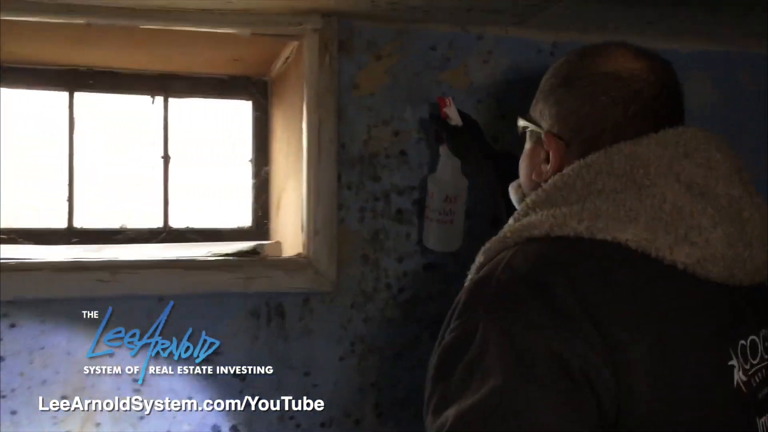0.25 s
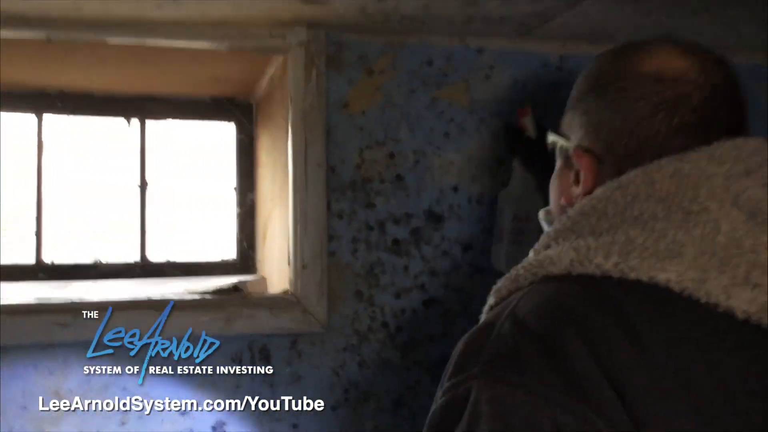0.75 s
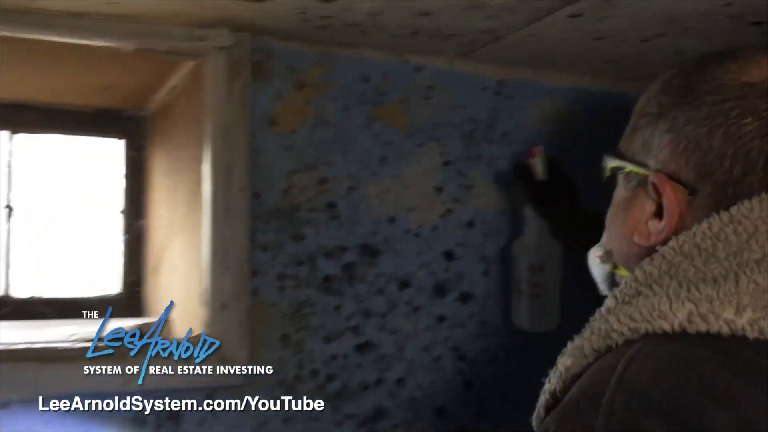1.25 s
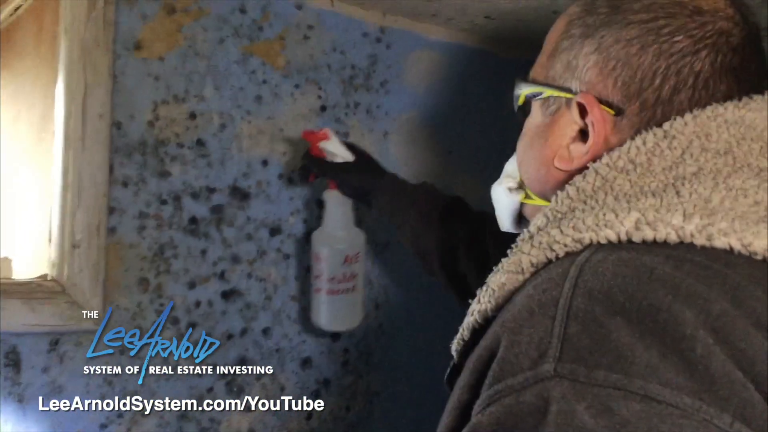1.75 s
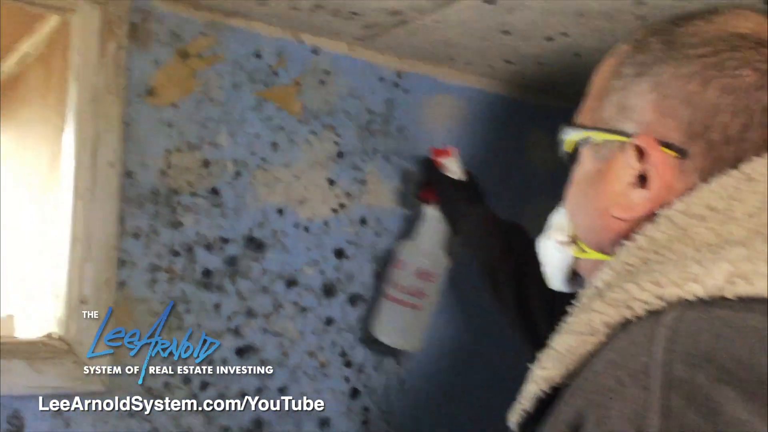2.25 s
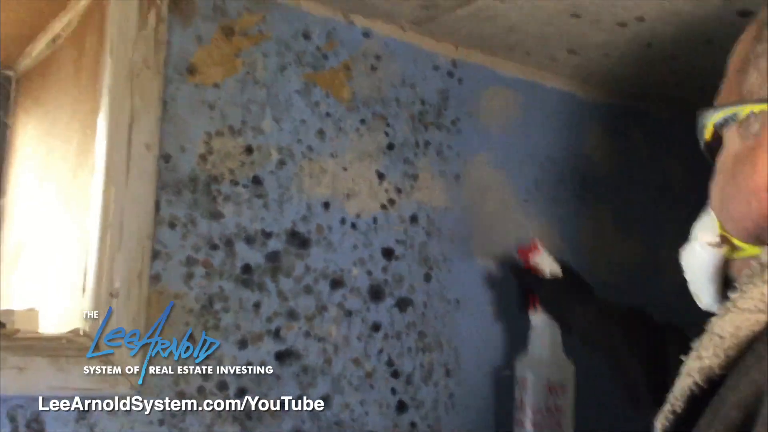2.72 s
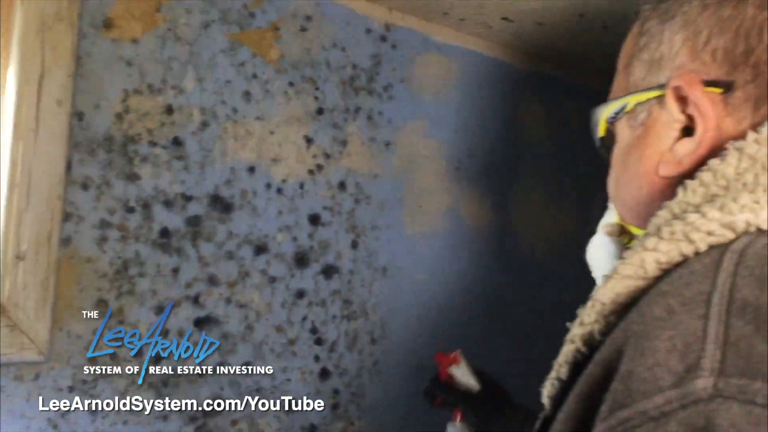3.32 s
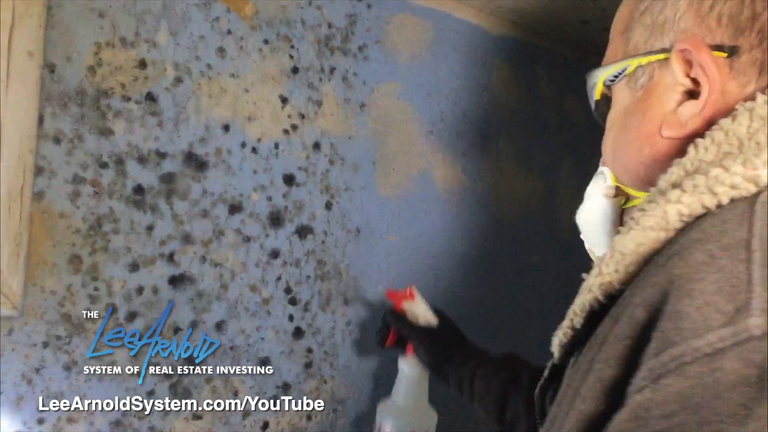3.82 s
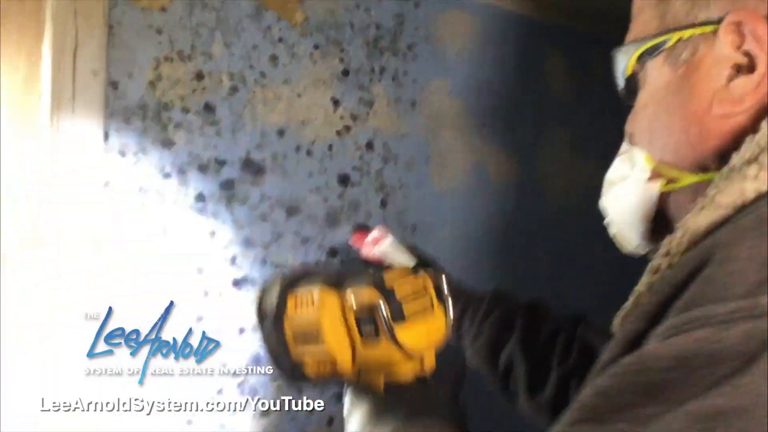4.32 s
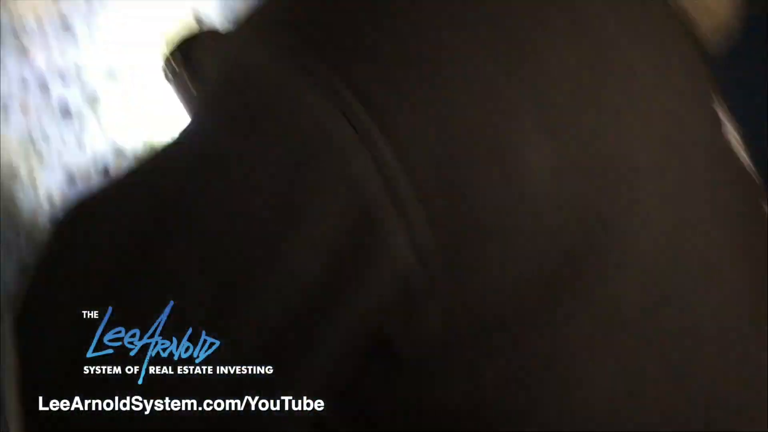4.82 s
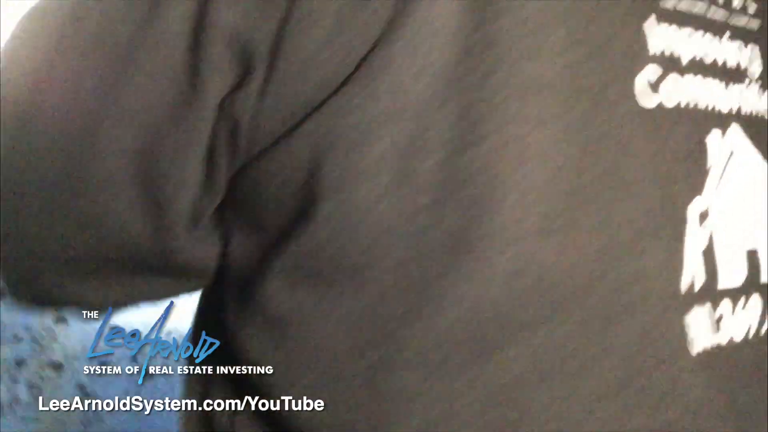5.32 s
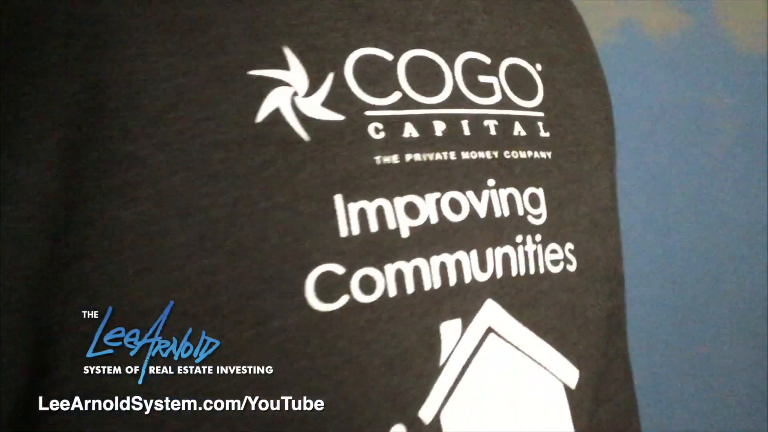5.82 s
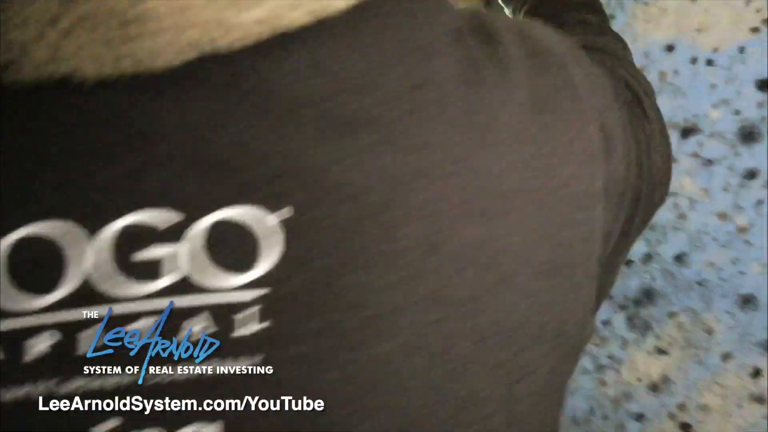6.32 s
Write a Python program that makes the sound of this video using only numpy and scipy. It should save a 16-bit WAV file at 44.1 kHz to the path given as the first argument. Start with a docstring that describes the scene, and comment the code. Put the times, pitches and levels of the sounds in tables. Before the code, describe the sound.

A trigger spray bottle is pumped sixteen times at a wall, in an even rhythm of two or three squirts a second. Each pull gives a short, bright hiss, with faint plastic ticks before and after. A heavy jacket rustles softly, and the close hand-held microphone takes a few dull bumps near the start and near the end. The room is small and quiet, with a faint low rumble.

```python
"""In a small, quiet room, a trigger spray bottle is pumped sixteen times at a wall.
Each pull starts with a faint plastic tick, then a coarse jet breaks into fine mist as the pressure
peaks, and the trigger ticks back. A heavy jacket rustles as cloth slides on cloth, and the hand-held
microphone takes a few dull bumps and snaps. Underneath lie a low rumble and, early on, a faint hum."""
import sys
import numpy as np
from scipy import signal
from scipy.fft import rfft, irfft
from scipy.io import wavfile
from scipy.ndimage import uniform_filter1d

SR = 44100
rng = np.random.default_rng(int(sys.argv[2]) if len(sys.argv) > 2 else 0)


def materialize(psi):
    """Save the field psi as 16-bit PCM at rate SR to the path in sys.argv[1].

    A 1-D psi becomes a single channel; in a 2-D psi each row is a channel.
    """
    bounded = np.clip(np.atleast_2d(psi).T, -1, 1)
    quanta = np.round(bounded * 32767).astype(np.int16)
    wavfile.write(sys.argv[1], SR, quanta)


N = 289296

# Decay of the room: (frequency [Hz], time to fall 60 dB [s])
ROOM_DECAY = [(200, 0.33), (1500, 0.2), (5000, 0.18), (10000, 0.19), (16000, 0.16)]
# Colour of the room tone: (frequency [Hz], relative level [dB])
RUMBLE_SPECTRUM = [(20, -21.5), (50, -9.5), (100, 4), (170, 0.5), (260, -3.5), (420, -12), (600, -14.5),
                   (900, -28.5), (1600, -36.5), (2600, -50.5), (5000, -43.5), (16000, -54.5)]
# The rumble swells twice and dips once: (centre time [s], half-width [s], gain [dB])
RUMBLE_RIDES = [(1.149, .35, 4.5), (4.85, 0.11, 8), (5.76, 0.095, -19)]
# Movements of the jacket: (centre time [s], length [s], swish level [dB], rub level [dB])
JACKET_MOVES = [(0.022, 0.28, -62, -71), (.42, 0.32, -66, -79), (0.896, 0.47, -57.5, -74.5),
                (1.08, 0.28, -73, -67.5), (1.87, 0.49, -93, -75), (2.47, 0.33, -89, -76),
                (2.888, 0.12, -97, -80), (4.076, .14, -85, -75), (4.796, 0.6, -63.5, -65.5),
                (5.33, 0.61, -80, -74), (5.67, 0.11, -67, -69), (5.75, 1.5, -81.5, -90.5),
                (6.01, 0.27, -74, -64), (6.42, 0.7, -78, -77.5)]
# The cloth's bright swish and soft rub: (frequency [Hz], relative level [dB])
SWISH_SPECTRUM = [(500, -6.5), (2000, -3.5), (4500, -6), (7000, -2.5), (8500, 1), (10500, -1), (13000, -1),
                  (16000, 1)]
RUB_SPECTRUM = [(100, 2.5), (300, 9.5), (800, 5.5), (1300, 7), (2300, -4.5), (3500, -22), (6000, -16.5),
                (16000, -30.5)]
# Quick sleeve slides: (time [s], length [s], level [dB], start pitch [Hz], end pitch [Hz],
# half-bandwidth [Hz])
SLEEVE_SLIDES = [(.034, 0.099, -56.5, 13300, 13300, 1300), (0.444, 0.027, -59, 13600, 13800, 1500),
                 (0.737, .31, -63, 8360, 8890, 800), (0.844, .17, -60, 1950, 3120, 582)]
# Dull bumps on the microphone: (peak time [s], level [dB], pitch [Hz], swell [s], decay [s])
MIC_BUMPS = [(.037, -56.5, 598, 0.016, 0.044), (.09, -48.5, 620, 0.016, .018),
             (.4268, -30.5, 735, 0.0032, 0.0019), (.46, -57.5, 678, 0.032, .008),
             (.495, -54.5, 130, .0042, 0.027), (1.678, -62.5, 533, .002, .01),
             (1.706, -62.5, 547, .003, 0.028), (3.219, -59.5, 118, 0.0057, 0.015),
             (5.556, -28.5, 582, .0016, 0.0038), (5.559, -38.5, 197.9, 0.0018, .005),
             (5.939, -49, 638, 0.0038, 0.0044), (5.988, -48.5, 333, .005, 0.017),
             (5.998, -37.5, 188, .004, 0.0028), (6.06, -55.5, 266, .04, 0.042),
             (6.459, -55, 447, .0012, .0028)]
# Short side modes of every bump: (pitch [multiple of the bump's], relative level [dB], decay [s])
BUMP_SIDE_MODES = [(.8, -14, .003), (1.36, -12, 0.0025)]
# Small handling snaps: (time [s], level [dB], low-pass cutoff [Hz])
HANDLING_SNAPS = [(.4185, -51, 17000), (0.4235, -41, 17000), (.503, -59, 5000), (0.523, -54.5, 5000),
                  (.54, -58, 5000), (0.553, -58, 5000)]
# Colours of a handling snap and of the trigger's tick: (frequency [Hz], relative level [dB])
SNAP_SPECTRUM = [(300, -24), (1000, -22.5), (1700, 3.5), (2600, 8), (4200, 5), (6000, -2), (8500, 4),
                 (16000, -1.5)]
TICK_SPECTRUM = [(500, -13), (2500, -12), (4500, -16.5), (6000, -3), (8300, -1), (10500, -1), (14300, 5.5),
                 (16000, -2)]
# Colours of the coarse jet and of the fine mist: (frequency [Hz], relative level [dB])
JET_SPECTRUM = [(100, -35.5), (400, -16), (700, -11), (1000, -9), (1500, -3.5), (2200, -2), (3300, -2.5),
                (4500, -2), (6000, -6), (10000, -12.5), (16000, -13)]
MIST_SPECTRUM = [(500, -46.5), (1800, -19), (3000, -3.5), (3900, 1.5), (4650, 6), (5400, 3.5), (6200, 0),
                 (7400, -0.5), (8400, 1.5), (9600, -2), (11000, -2.5), (13000, -2), (15000, -4),
                 (16000, -7.5)]
# Pulls of the trigger: (time [s], length [s], base level [dB], jet trim [dB],
# treble lift as the nozzle turns [dB], base tick level [dB])
TRIGGER_PULLS = [(0.195, 0.15, -41, 2.4, 4, -77.5), (0.573, 0.17, -40.5, -1.4, 2.5, -71),
                 (.987, .15, -41.5, 3.5, 1.5, -71), (1.365, 0.16, -40.1, 2, 3.1, -69.5),
                 (1.78, 0.19, -39.5, 2, 3, -74.5), (2.248, 0.16, -39.5, 2, 2, -74.5),
                 (2.642, .14, -39, 2.4, 3, -68.5), (3.006, 0.17, -40, 2.5, 3.5, -70),
                 (3.407, .165, -39.5, 2, 3, -71.5), (3.83, 0.19, -40, 3, 3.5, -76),
                 (4.237, 0.18, -39, 4, 4, -66), (4.645, .18, -39.5, 3.5, 4.5, -63),
                 (5.054, 0.19, -40.5, 2.5, 4, -70), (5.459, .183, -41, 2.9, 4.5, -82),
                 (5.866, 0.18, -42, 4.5, 4, -72), (6.269, 0.16, -39.5, 2, 3.5, -73)]

RUMBLE_DB = -75
HUM_HZ, HUM_DB, HUM_FROM_S, HUM_TO_S, HUM_FADE_S = 156.6, -74, 0.7, 2.65, 0.071
STILL_SWISH_DB, STILL_RUB_DB = -92.5, -96.5  # the cloth never quite rests
TICK_LEAD_S, RETURN_LAG_S, RETURN_SPREAD_S, RETURN_DB, RETURN_SPREAD_DB = 0.054, 0.07, 0.014, -76, 5
JET_LEAD_S, JET_ATTACK_S, JET_STOPS_EARLY_S, JET_RELEASE_S = 0.0073, 0.0056, 0.0088, 0.017
MIST_LAG_S, MIST_ATTACK_S, MIST_STOPS_EARLY_S, MIST_RELEASE_S = 0.011, 0.009, 0.02, 0.0135
JET_TRIM_DB, MIST_TRIM_DB = -10.5, 0.56
MIST_SWELL_DB, JET_SAG_DB = 7.5, 2  # at peak pressure more of the jet turns into mist
WALL_ECHO_MS, WALL_ECHO_GAIN = (0.3, 1.25), -0.078  # the delay changes with the aim
LOW_CUT_HZ, HIGH_CUT_HZ = 62, 15950


def gain_of(db):
    """Decibels to amplitude."""
    return 10 ** (np.asarray(db) / 20)


def unit_rms(x):
    """Scales to rms 1."""
    return x / np.sqrt(np.mean(x ** 2) + 1e-20)


def curve_at(points, hz):
    """Reads a table on a log-frequency axis."""
    freqs, values = np.transpose(points)
    return np.interp(np.log(hz + 1), np.log(freqs + 1), values)


def add(mix, time, sound):
    """Mixes a sound in at a time in seconds."""
    start = round(time * SR)
    sound = sound[max(-start, 0):]
    part = mix[max(start, 0):][:len(sound)]
    part += sound[:len(part)]


def noise(spectrum, size):
    """Noise of rms 1 with the given colour."""
    colour = gain_of(curve_at(spectrum, np.fft.rfftfreq(size, 1 / SR)))
    return unit_rms(irfft(rfft(rng.standard_normal(size)) * colour, size))


def wander(hz, size):
    """Smooth random modulation of rms 1, rolled off above hz."""
    rolloff = 1 + (np.fft.rfftfreq(size, 1 / SR) / hz) ** 4
    return unit_rms(irfft(rfft(rng.standard_normal(size)) / rolloff, size))


def gate(t, start, stop, attack, release):
    """Attack, hold and release with rounded corners."""
    return (1 + np.tanh((t - start) / attack / 2)) * (1 + np.tanh((stop - t) / release / 2)) / 4


def room(x, wet_db, size=16384):
    """Direct sound plus a fresh diffuse tail, as heard from one position in the room."""
    hz, t, bands = signal.stft(rng.standard_normal(size), SR, nperseg=256)
    decay = gain_of(-60 * t / curve_at(ROOM_DECAY, hz)[:, None])
    tail = signal.istft(bands * decay, SR, nperseg=256)[1]
    tail *= np.minimum(np.arange(len(tail)) / SR / 0.0007, 1)
    response = gain_of(wet_db) * tail / np.linalg.norm(tail)
    response[0] += 1
    return signal.fftconvolve(x, response / np.linalg.norm(response))


def room_tone():
    """A bed of uneven low rumble, with a wavering hum that fades in and out."""
    t = np.arange(N) / SR
    ride_db = sum(db * np.exp(-((t - centre) / width) ** 2) for centre, width, db in RUMBLE_RIDES)
    rumble = noise(RUMBLE_SPECTRUM, N) * gain_of(RUMBLE_DB + ride_db + 3.75 * wander(9, N))
    hum_level = gain_of(HUM_DB + 6.3 * wander(11, N))
    hum_level *= gate(t, HUM_FROM_S, HUM_TO_S, HUM_FADE_S, HUM_FADE_S)
    hum_hz = HUM_HZ + 4 * wander(12, N)
    return rumble + hum_level * np.sin(2 * np.pi * np.cumsum(hum_hz) / SR)


def jacket():
    """Cloth sliding on cloth: a grainy swish over a softer rub, swelling with each movement."""
    t = np.arange(N) / SR
    swish, rub = gain_of(STILL_SWISH_DB), gain_of(STILL_RUB_DB)
    for centre, length, swish_db, rub_db in JACKET_MOVES:
        swell = np.maximum(1 - (2 * (t - centre) / length) ** 2, 0) ** 1.28
        swish = swish + gain_of(swish_db) * swell
        rub = rub + gain_of(rub_db) * swell
    catching = gain_of(1.5 * wander(50, N))
    folds = gain_of(2.2 * wander(16, N))  # folds make the rub lumpy
    return catching * (swish * noise(SWISH_SPECTRUM, N) + folds * rub * noise(RUB_SPECTRUM, N))


def sleeve():
    """The weave hisses in a narrow band, which sweeps upward when the arm speeds up."""
    out = np.zeros(N)
    for time, length, db, start_hz, end_hz, width_hz in SLEEVE_SLIDES:
        size = int(length * SR)
        phase = 2 * np.pi * np.cumsum(np.linspace(start_hz, end_hz, size)) / SR
        band = wander(width_hz, size) * np.cos(phase) + wander(width_hz, size) * np.sin(phase)
        add(out, time, gain_of(db) * band * np.sin(np.linspace(0, np.pi, size)))
    return out


def click(db, spectrum, decay, size=4096):
    """A noise burst with an instant attack and an exponential tail."""
    return gain_of(db) * noise(spectrum, size) * np.exp(-np.arange(size) / SR / decay)


def bump(time, db, hz, swell, decay, size=12000):
    """A damped, unsteady ring swells as the hand presses and dies as it lets go: (start, sound)."""
    t = (np.arange(size) - size // 2) / SR
    cycles = np.cumsum(hz * (1 + 0.084 * wander(100, size))) / SR
    cycles -= cycles[size // 2]
    ring = np.exp(np.minimum(t / swell, -t / decay)) * np.sin(2 * np.pi * cycles)
    for ratio, mode_db, mode_decay in BUMP_SIDE_MODES:
        ring += gain_of(mode_db) * np.exp(-abs(t) / mode_decay) * np.sin(2 * np.pi * ratio * cycles)
    return time + t[0], gain_of(db) * ring


def handling():
    """Bumps and snaps right at the microphone, almost dry."""
    out = np.zeros(N)
    for row in MIC_BUMPS:
        add(out, *bump(*row))
    for time, db, cutoff_hz in HANDLING_SNAPS:
        lowpass = signal.butter(2, cutoff_hz, fs=SR)
        add(out, time, signal.lfilter(*lowpass, click(db, SNAP_SPECTRUM, decay=0.0047)))
    return room(out, wet_db=-27.5)[:N]


def tick(db):
    """A short plastic tick; the piston then scrapes on briefly."""
    attack = click(db + 3.5, TICK_SPECTRUM, decay=0.0031)
    scrape = click(db - 3, TICK_SPECTRUM, decay=0.025)
    return room(attack + scrape, wet_db=-4.5)


def trigger():
    """The trigger takes up its slack before each pull and springs back after it."""
    out = np.zeros(N)
    scatter = rng.standard_normal((len(TRIGGER_PULLS), 2))
    for (time, length, *_, tick_db), (lateness, force) in zip(TRIGGER_PULLS, scatter):
        add(out, time - TICK_LEAD_S, tick(tick_db))
        return_time = time + length + RETURN_LAG_S + RETURN_SPREAD_S * lateness
        add(out, return_time, tick(RETURN_DB + RETURN_SPREAD_DB * force))
    return out


def close_reflections(x, strength, count=7, size=300):
    """A few faint echoes off hand, bottle and sleeve, new with each pose of the arm."""
    taps = np.zeros(size)
    taps[rng.integers(size // 10, size, count)] = strength * rng.choice([-1, 1], count)
    taps[0] = 1
    return signal.fftconvolve(x, taps / np.linalg.norm(taps))


def jet(t, length, pressure, jet_db):
    """The coarse jet runs through the whole pull and sags as the pressure peaks."""
    envelope = gate(t, -JET_LEAD_S, length - JET_STOPS_EARLY_S, JET_ATTACK_S, JET_RELEASE_S)
    hiss = noise(JET_SPECTRUM, len(t)) * envelope
    drops_db = 0.73 * wander(350, len(t))  # large drops leave unevenly
    sputter_db = 1.2 * wander(40, len(t))
    return hiss * gain_of(JET_TRIM_DB + jet_db - JET_SAG_DB * pressure + drops_db + sputter_db)


def mist(t, length, pressure):
    """Fine, bright mist forms only while the pressure is high, and swells with it."""
    detune = 1 + 0.0068 * rng.standard_normal()  # no two squeezes ring the nozzle quite alike
    envelope = gate(t, MIST_LAG_S, length - MIST_STOPS_EARLY_S, MIST_ATTACK_S, MIST_RELEASE_S)
    hiss = noise(np.array(MIST_SPECTRUM) * [detune, 1], len(t)) * envelope
    return hiss * gain_of(MIST_TRIM_DB - MIST_SWELL_DB * (1 - pressure))


def spray_cone(hiss, treble_db):
    """The fluttering liquid cone shifts the colour in patches; the nozzle's aim lifts the treble."""
    hz, _, bands = signal.stft(hiss, SR, nperseg=512)
    patches = uniform_filter1d(rng.standard_normal(bands.shape), size=5, axis=0)
    patches = unit_rms(uniform_filter1d(patches, size=9, axis=1))
    shelf_db = curve_at([(6000, 0), (9000, treble_db)], hz)[:, None]
    return signal.istft(bands * gain_of(2.0 * patches + shelf_db), SR, nperseg=512)[1][:len(hiss)]


def spray(time, length, db, jet_db, treble_db, size=20000):
    """One arc of pressure drives jet and mist, and the wall's echo combs the hiss: (start, sound)."""
    preroll_s = 0.06
    t = np.arange(size) / SR - preroll_s
    pressure = np.sin(np.pi * np.clip(t / length, 0, 1))
    hiss = gain_of(db) * (jet(t, length, pressure, jet_db) + mist(t, length, pressure))
    hiss = spray_cone(hiss, treble_db)
    wall_echo = WALL_ECHO_GAIN * np.interp(t - rng.uniform(*WALL_ECHO_MS) / 1000, t, hiss)
    return time - preroll_s, room(close_reflections(hiss + wall_echo, strength=0.12), wet_db=-10.5)


def scene():
    """Room tone, cloth, handling and sprays; one microphone feeds both channels."""
    mix = room_tone() + jacket() + sleeve() + trigger() + handling()
    for *pull, _ in TRIGGER_PULLS:
        add(mix, *spray(*pull))
    return np.array([mix, mix])


def record(dry):
    """The microphone's bass roll-off, then a steep high cut."""
    low_cut = signal.butter(2, LOW_CUT_HZ, "high", fs=SR, output="sos")
    high_cut = signal.firwin(511, HIGH_CUT_HZ, window=("kaiser", 9), fs=SR)
    return signal.oaconvolve(signal.sosfilt(low_cut, dry), high_cut[None], "same")


dry = scene()
out = record(dry)
materialize(out)
```